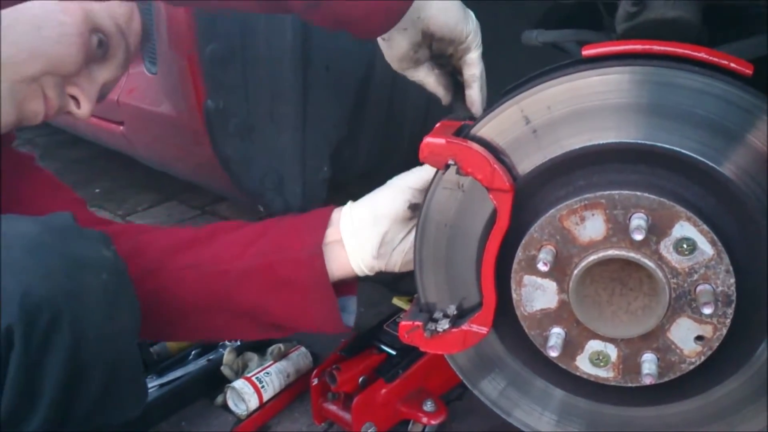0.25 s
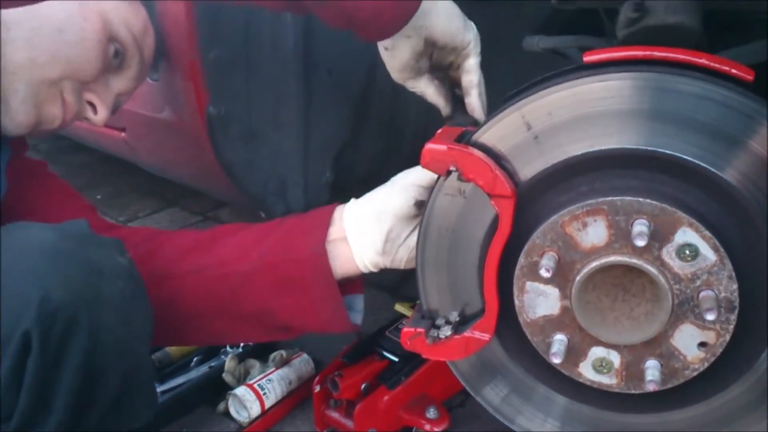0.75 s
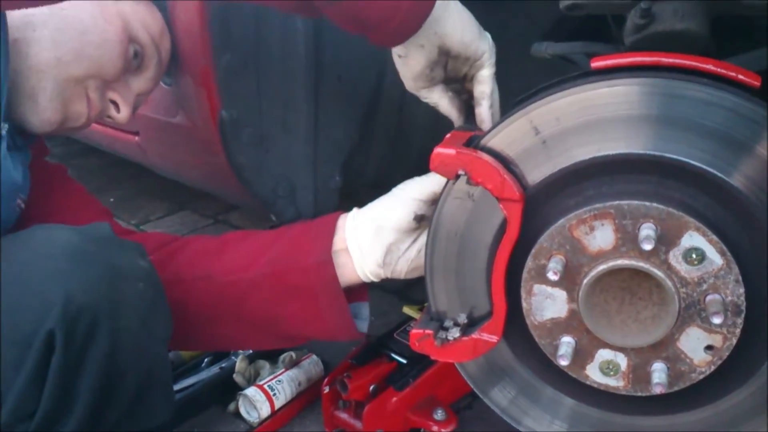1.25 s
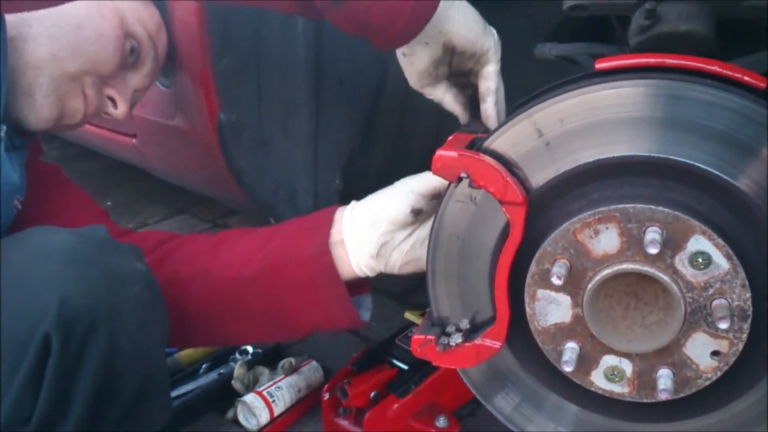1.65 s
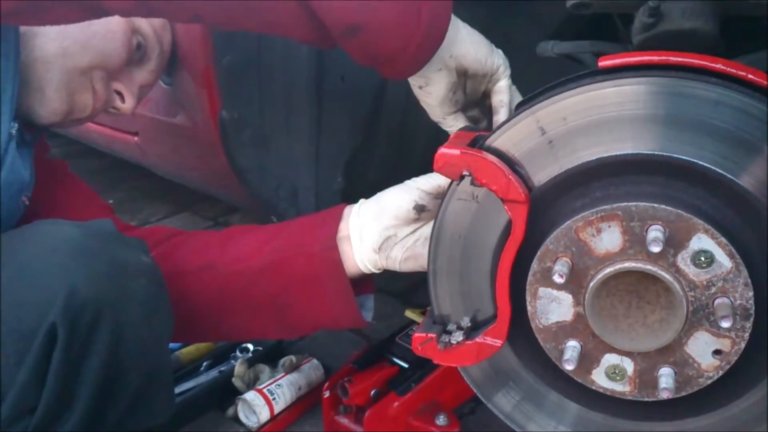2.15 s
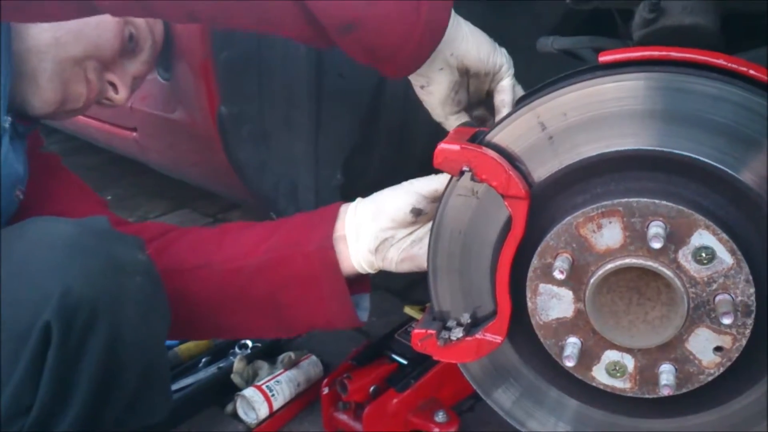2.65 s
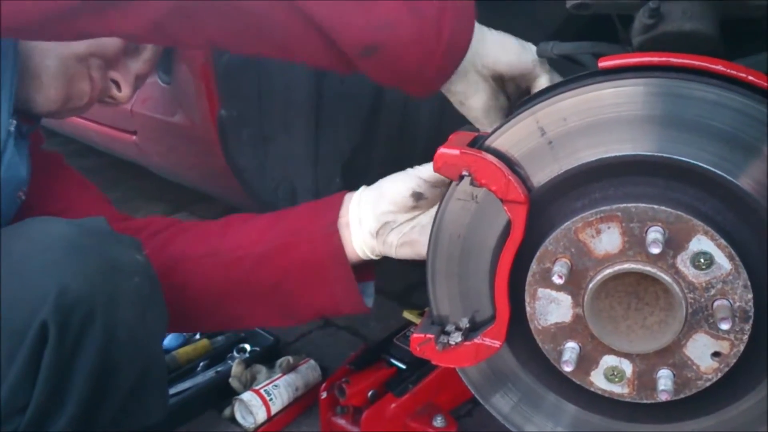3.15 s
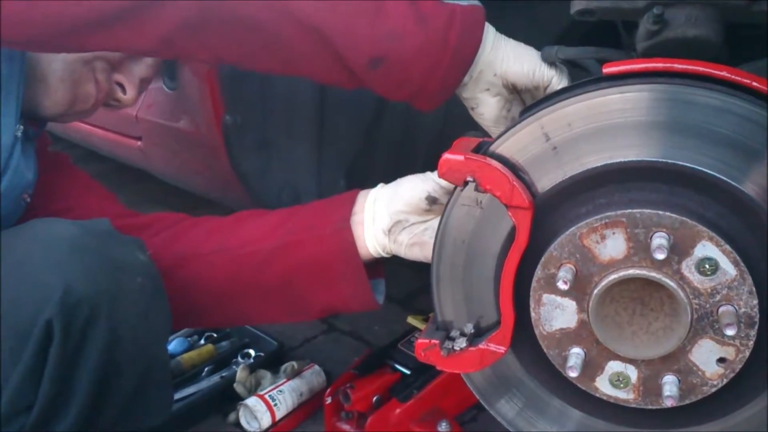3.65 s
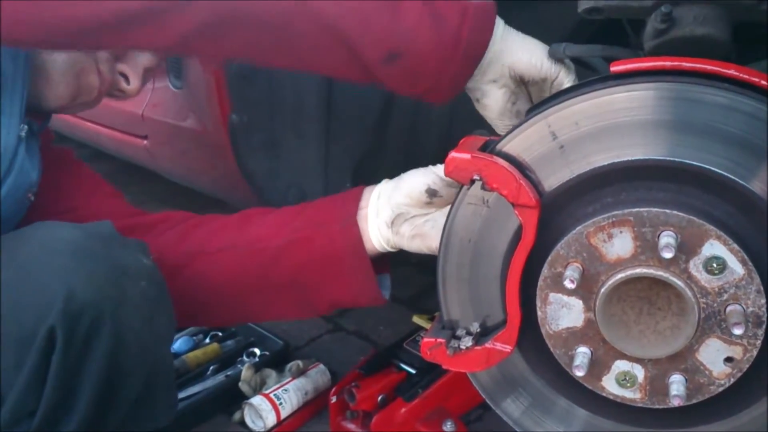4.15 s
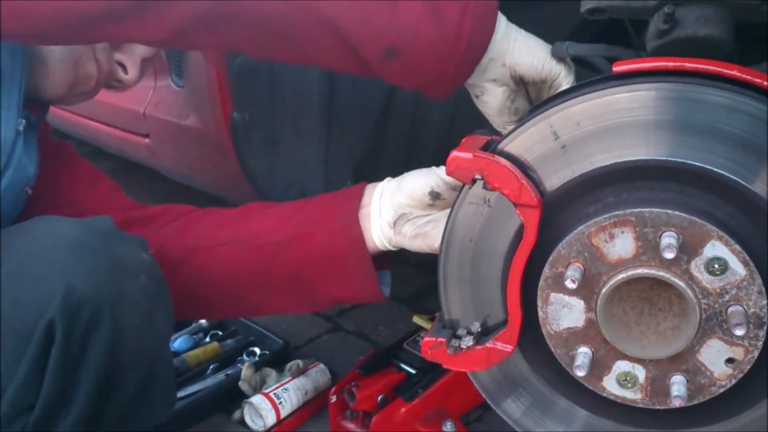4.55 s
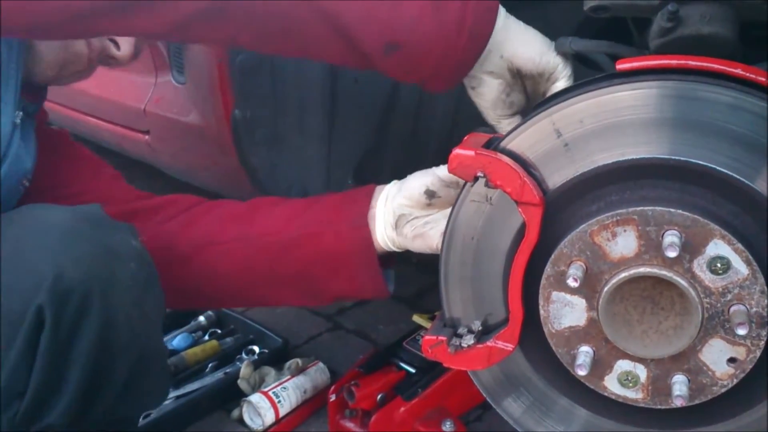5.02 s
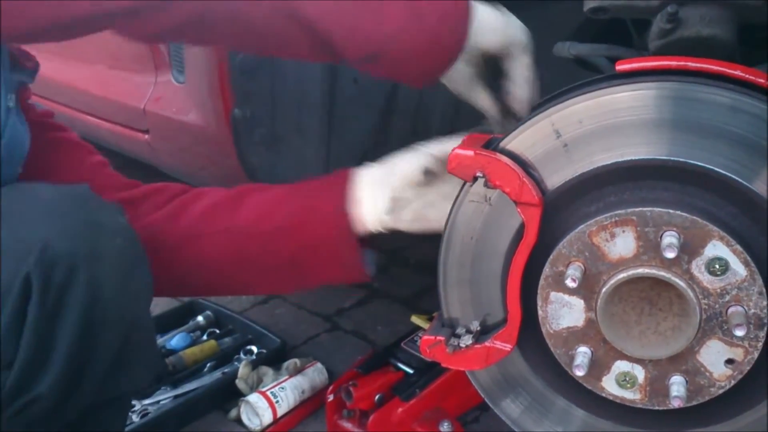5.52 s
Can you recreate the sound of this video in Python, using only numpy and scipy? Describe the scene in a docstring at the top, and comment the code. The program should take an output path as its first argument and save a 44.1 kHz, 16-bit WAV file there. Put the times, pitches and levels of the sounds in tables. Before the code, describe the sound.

Metal pad being fitted: dull knocks, a short rising scrape, then groups of quick ringing clinks over lumpy low wind rumble.

```python
"""Brake pad clinking into its bracket

Modal rings and bursts of chatter make a steel pad clink on the brake disc in three short runs.
Shaped noise makes glove scuffs, dull ringing knocks and one scrape of the pad along its seat.
Lumpy low noise is a draught, nearly all on the right, over a faint noise hush; decaying or
bell-shaped tones make a very faint tick and one tiny squeak."""
import sys
import numpy as np
from scipy.fft import rfft, irfft, next_fast_len
from scipy.io import wavfile
from scipy.ndimage import map_coordinates

SR = 44100
rng = np.random.default_rng(int(sys.argv[2]) if len(sys.argv) > 2 else 0)


def output_pcm(signal):
    """Save a mono or channel-first signal as 16-bit PCM at the path in sys.argv[1].

    Samples are clipped to [-1, 1] before scaling.
    """
    pcm = np.clip(np.atleast_2d(signal).T, -1, 1) * 32767
    wavfile.write(sys.argv[1], SR, np.round(pcm).astype(np.int16))


N = 254935


def amp(db):
    """Decibels to gain."""
    return 10 ** (np.asarray(db) / 20)


def along(points, hz):
    """Each column of a (f/Hz, ..) table, read on a log frequency axis."""
    f, *columns = np.transpose(points)
    return np.array([np.interp(np.log(hz + 1), np.log(f + 1), c) for c in columns])


def curve(rows):
    """A (t/s, value) table as one value per sample."""
    return np.interp(np.arange(N) / SR, *np.transpose(rows))


def unit(x):
    """Scaled to rms 1."""
    return x / np.sqrt(np.mean(x ** 2) + 1e-20)


def wobble(rate):
    """A smooth random curve, rate knots a second."""
    knots = rng.standard_normal(int(N * rate / SR) + 4)
    return map_coordinates(knots, [np.arange(N) * rate / SR])


def filtered(x, response):
    """x times a response of frequency."""
    n = x.shape[-1]
    padded = next_fast_len(n + 8192)
    spectrum = rfft(x, padded) * response(np.fft.rfftfreq(padded, 1 / SR))
    return irfft(spectrum, padded)[..., :n]


def noise(spectrum, size, alike=0):
    """Noise with a density in dB per Hz for each channel; alike is the power share the channels share."""
    share = np.clip(alike, 0, 1)
    own = rng.standard_normal((len(spectrum[0]) - 1, size))
    common = rng.standard_normal(size)
    white = np.sqrt(1 - share) * own + np.sqrt(share) * common
    return filtered(white * np.sqrt(SR / 2), lambda hz: amp(along(spectrum, hz)))


def tinted(x, points):
    """x coloured by (f/Hz, level/dB) points."""
    return filtered(x, lambda hz: amp(along(points, hz)))


def fade(t, t60):
    """Free decay, 60 dB down after t60; full level before t = 0."""
    return np.exp(-np.log(1000) * np.maximum(t, 0) / t60)


def add(track, s, sound):
    """Mix a sound into the track from time s on."""
    part = track[:, round(s * SR):][:, :sound.shape[1]]
    part += sound[:, :part.shape[1]]


def ring(t, modes, colour, length, scatter_db, build_cycles):
    """Decaying modes at new strengths; each needs a few cycles to build, so the low ones bloom late."""
    hz, db, t60, left_db = np.transpose(modes)
    level = amp(db + along(colour, hz)[0] + scatter_db * rng.standard_normal(len(hz)))
    cycles = hz[:, None] * t
    build = 1 - np.exp(-(cycles / build_cycles) ** 2)
    swing = level[:, None] * fade(t, length * t60[:, None]) * build
    start_phase = rng.random((len(hz), 1))
    waves = swing * np.exp(2j * np.pi * (cycles + start_phase))
    # the left hears each mode 0.1 ms later, most of them weaker
    left = amp(left_db) * np.exp(-2j * np.pi * hz * .0001)
    return np.array([left @ waves, waves.sum(0)]).imag


# spectrum of the background hush: f/Hz, left level/dB per Hz, right level/dB per Hz
HUSH_SPECTRUM = [(24.4, -81.5, -67.5), (129, -91.5, -98.5), (287, -100, -99), (527, -105, -101),
                 (846, -92, -91.5), (1000, -92, -93), (1310, -105, -97.5), (1930, -112, -102),
                 (4004, -118, -112), (6790, -121, -115), (7850, -122, -105), (9900, -124, -122),
                 (15280, -125, -123)]


def hush():
    """Distant background noise, slightly restless in level."""
    restless_db = 0.28 * wobble(1.6) + 0.51 * wobble(5.7)
    return noise(HUSH_SPECTRUM, N, alike=.1) * amp(restless_db)


def ticks(first=.025, period=.641):
    """A very faint, regular 430 Hz tick, stronger on the left, that swells and dies within milliseconds."""
    from_tick = (np.arange(N) / SR - first + period / 2) % period - period / 2
    pulse = np.exp(-np.abs(from_tick) / 0.00092) * np.cos(2 * np.pi * 430 * from_tick)
    return amp([[-47], [-75]]) * pulse


# mean relative strength of the draught: t/s, level/dB
DRAUGHT_MEAN = [(0, -59.5), (.6, -60), (1, -61), (1.3, -56), (1.9, -68), (2.4, -63.5), (3, -50.5),
                (3.5, -51), (4.1, -54), (4.6, -44.5), (5.35, -43.5), (5.78, -63)]
# the strongest puffs: t/s, level/dB above the mean
DRAUGHT_PUFFS = [(.52, 11), (.73, 13), (1.23, 7), (2.27, 14), (2.57, 9.5), (3.42, 8), (3.6, 11), (4.2, 5.5),
                 (4.71, 2.5), (4.97, 10), (5.221, 14.5)]
# relative spectrum of the low rumble: f/Hz, level/dB
RUMBLE_SPECTRUM = [(8, 0), (22, -1.5), (65, -8.5), (100, -15), (170, -46.5), (300, -43.5), (700, -85.5)]
# relative spectrum of the higher flutter: f/Hz, level/dB
FLUTTER_SPECTRUM = [(40, -26.5), (100, 6), (180, -2.5), (300, -15), (600, -32), (1500, -56)]
PUFF_S, EDDY_DB, EDDY_RATE = 0.043, 3, 10  # half length of a puff; depth and knots a second of the eddies


def draught():
    """Moving air rumbles in lumps, mostly on the right; stronger gusts bring more of the higher flutter."""
    t = np.arange(N) / SR
    puffs_db = sum(db * np.exp(-((t - s) / PUFF_S) ** 2) for s, db in DRAUGHT_PUFFS)
    gust_db = curve(DRAUGHT_MEAN) + puffs_db + EDDY_DB * wobble(EDDY_RATE)
    lumps = wobble(24)
    rumble = amp(gust_db + 7.5) * unit(noise(RUMBLE_SPECTRUM, N) * amp(1.0 * lumps))
    flutter_lumps = amp(2.1 * lumps + 2.5 * wobble(50))
    # flutter gains 1.22 dB for each dB of gust
    flutter_gain = amp(-56.5 + 1.22 * (gust_db + 50.0))
    flutter = flutter_gain * unit(noise(FLUTTER_SPECTRUM, N) * flutter_lumps)
    return (rumble + flutter) * amp([[-32], [0]])


def squeak(s=.918, length=0.0054, hz=13150, db=-54):
    """A steel clip gives one tiny, very high squeak, a bell-shaped tone of unsteady pitch."""
    t = np.arange(N) / SR
    phase = 2 * np.pi * np.cumsum(hz * (1 + .003 * wobble(300))) / SR
    return amp([[db - 26], [db]]) * np.exp(-((t - s) / length) ** 2) * np.sin(phase)


# how firmly the hand holds the pad, also read by the clinks: t/s, grip/0-1
HAND_GRIP = [(1.6, 0), (2.8, 0.23), (3.2, 0.6), (4.1, 1), (5.3, 0.83)]
# glove rubs: start t/s, level/dB, time to the peak/s
GLOVE_SCUFFS = [(.748, 5.5, 0.0048), (0.893, -1.5, 0.0099), (2.022, -4, 0.0026), (3.203, -3, 0.0027),
                (4.122, -1, 0.0028), (4.386, -10.5, 0.0053), (4.647, -15.5, 0.0086), (5.008, -8, .008),
                (5.193, -1.5, 0.0037), (5.493, -5, 0.012)]
# spectrum of glove on metal: f/Hz, left level/dB per Hz, right level/dB per Hz
GLOVE_SPECTRUM = [(500, -125, -115), (1280, -118, -104), (1900, -114, -90), (3800, -118, -100),
                  (7100, -120, -93.5), (7670, -118, -83), (10100, -122, -104), (15500, -122, -108)]
SCUFF_BODY_DB, GRIP_BODY_DB = -6, 19  # body up to 3 kHz of a light rub, and its gain at full grip


def scuffs():
    """Short, grainy rubs of a glove on metal that catch and let go; a firmer grip gives them more body."""
    out, t, grips = np.zeros((2, N)), np.arange(SR // 5) / SR, curve(HAND_GRIP)
    for s, db, rise in GLOVE_SCUFFS:
        body_db = SCUFF_BODY_DB + GRIP_BODY_DB * grips[round(s * SR)]
        smooth_rub = tinted(noise(GLOVE_SPECTRUM, len(t)), [(3000, body_db), (6000, 0)])
        rub = smooth_rub * amp(1.5 * wobble(380)[:len(t)])
        catch = t / rise * np.exp(1 - t / rise)
        add(out, s, amp(db) * rub * catch)
    return out


# spectrum of the pad rubbing on its seat: f/Hz, left level/dB per Hz, right level/dB per Hz
SCRAPE_SPECTRUM = [(307, -110, -110), (546, -93.5, -90.5), (750, -102, -100), (1260, -100, -88),
                   (1680, -104, -89.5), (2020, -112, -91), (2330, -110, -92), (3330, -120, -107),
                   (5030, -130, -122)]
SLIDE_FROM_S, SLIDE_TO_S, SLIDE_DB = 1.1, 1.41, 7  # start, stop, gain at the stop
SLIDE_GROWS_DB_PER_S, SLIDE_EDGE_T60_S = 51, .1  # swell on the way; time to catch and to die away


def slide():
    """Uneven friction sounds the pad's resonances, pushed ever harder along its seat until it stops."""
    t = np.arange(N) / SR
    push_db = SLIDE_DB - SLIDE_GROWS_DB_PER_S * np.maximum(SLIDE_TO_S - t, 0)
    moving = fade(SLIDE_FROM_S - t, SLIDE_EDGE_T60_S) * fade(t - SLIDE_TO_S, SLIDE_EDGE_T60_S)
    return noise(SCRAPE_SPECTRUM, N) * moving * amp(push_db + 1.6 * wobble(130))


# knocks of the pad held tight: t/s, level/dB, crispness level/dB from 1.6 kHz up
PAD_KNOCKS = [(0.8313, 0.5, 2), (.847, -9, -12), (.864, -22.5, 12.5), (2.1043, -9.5, -14.5)]
# spectrum of a knock: f/Hz, left level/dB per Hz, right level/dB per Hz
KNOCK_SPECTRUM = [(151.5, -100, -87), (406, -70, -62.5), (610, -78, -66), (910, -62, -68), (1410, -88, -70),
                  (2180, -82, -73), (3530, -95, -69.5), (6320, -104, -86), (7800, -105, -75.5),
                  (10040, -110, -90.5), (15460, -110, -80)]
# modes of the clamped pad and bracket: f/Hz, level/dB, t60/s, left against right level/dB
CLAMPED_MODES = [(432, -53, 0.33, -6), (547, -37.5, 0.16, -13), (1122, -44, 0.098, 5),
                 (1653, -38.5, 0.12, -12), (2025, -29, 0.027, -21), (2315, -32.5, 0.056, -21)]


def knocks():
    """Pressed by the hand, the pad clacks with hardly any ring, and grit crunches under it."""
    out, t = np.zeros((2, N)), np.arange(SR // 3) / SR
    for s, db, crisp_db in PAD_KNOCKS:
        colour = [(600, 0), (1600, crisp_db)]
        crunch = amp(2.2 * wobble(600)[:len(t)])
        burst = tinted(noise(KNOCK_SPECTRUM, len(t), alike=0.39), colour) * crunch
        low = tinted(burst, [(1500, -1.5), (5000, -22.5)])
        body = low * (fade(t, t60=0.16) + amp(-18) * fade(t, t60=0.63))
        crack = (burst - low) * fade(t - .004, t60=0.088)
        tone = ring(t, CLAMPED_MODES, colour, 1, scatter_db=0.0, build_cycles=1.9)
        contact = (body + crack) * (1 - np.exp(-t / 0.0017))
        add(out, s, amp(db) * (tone + amp(-4) * contact))
    return out


# pad meets disc: t/s, force level/dB, flatness of the landing/0-1,
# disc ping level/dB near 5.5 kHz, disc edge mode level/dB near 8 kHz, relative ring length
PAD_CLINKS = [(1.3786, -16, 0.01, -17.5, -11, 2.5), (1.5431, -0.5, 0.02, 6.5, -8.5, 1.086),
              (1.7348, 2.5, 0.17, 8.5, 13, 0.99), (2.6205, -11.5, 0, -10, -5, 0.99),
              (2.7844, -.5, 0.62, -4, -3, 0.97), (2.9753, 1.5, 0.97, 5, -4.5, 0.87),
              (4.898, -4, 0, -18.5, -1, 0.62), (5.0798, -2, 0.93, -9, -6, 0.8),
              (5.2467, 2, 0.47, -7.5, 0, 0.78), (5.362, -9.5, .2, -8, -8, 0.71)]
# points where each blow's colour is set: f/Hz
BLOW_COLOUR_HZ = [900, 1900, 2900, 4200, 5500, 6900, 8200, 8900]
# modes of disc and bracket before each blow's colour and length:
# f/Hz, level/dB, t60/s, left against right level/dB
STEEL_MODES = [(170, -44, .14, -11), (220, -35.5, .13, -8), (371, -44.0, 0.16, -14), (654, -53.5, 0.37, -3),
               (731, -38.4, 0.15, -1), (782, -39.4, 0.13, 0), (931, -44.9, 0.24, 2), (1006, -47.5, 0.22, 2),
               (1117, -47.6, 0.17, 3), (1592, -40.5, 0.33, -13), (2040, -52.0, 0.46, -25),
               (2090, -47.0, 0.3, -22), (2140, -55.3, 0.45, -19), (2828, -40.5, 0.46, -24),
               (2900, -44.2, 0.46, -19), (3381, -62.1, 0.38, -19), (3784, -44.2, 0.28, -27),
               (4188, -38.5, 0.3, -18), (5108, -53.5, 0.14, -24), (5363, -42.8, 0.19, -24),
               (5503, -31.4, 0.23, -27), (5744, -39.6, 0.23, -34), (6841, -46.1, 0.23, -40),
               (7080, -48.0, 0.17, -43), (8214, -32.8, 0.12, -55), (8888, -48.9, 0.12, -35),
               (9600, -53.2, 0.14, -36), (11000, -58, 0.15, -25), (12550, -68, .13, -22),
               (13900, -65, 0.15, -20), (15450, -68, 0.15, -34)]
# dense, quickly damped chatter of a clink: f/Hz, left level/dB per Hz, right level/dB per Hz
CHATTER_SPECTRUM = [(100, -100, -78.5), (220, -78, -70.5), (505.6, -84.5, -68.5), (810, -56, -57.5),
                    (1100, -56.5, -58.5), (1370, -69.5, -66), (1715, -63, -48.5), (2375, -83.5, -65.5),
                    (3190, -83.5, -65), (5200, -96.5, -71.5), (7950, -104, -77), (9900, -110, -99.5),
                    (15430, -108, -93.5)]
# how a blow weights the resonances near 1.7, 2.3 and 2.9 kHz, in that order:
# level/dB, slope/dB per dB of force, level/dB at full grip, level/dB for a flat landing
PAD_TONE_WEIGHTS = (1.5, 0.5, -1, -9.5)
CLACK_WEIGHTS = (-2.5, 2, -17.5, 13.5)
RING_WEIGHTS = (2.5, -0.16, 0, -2.5)
PAD_HZ, GRIP_RAISES_HZ = 1677.4, 59.6  # the pad's pitch held loosely, and its rise at full grip
CHATTER_S, GRIP_CALMS = 0.0076, 0.36  # time of contact held loosely, and the share lost at full grip
GRIP_MUTES_DB = 3.5  # loss of the modes near 7 kHz at full grip


def clinks():
    """The pad chatters briefly on the disc and both ring; grip raises the pad's pitch, dulls its clack."""
    out, t, grips = np.zeros((2, N)), np.arange(SR // 2) / SR, curve(HAND_GRIP)
    weights = np.array([PAD_TONE_WEIGHTS, CLACK_WEIGHTS, RING_WEIGHTS])
    # the dense resonances of the assembly answer every blow in much the same way
    assembly = noise(CHATTER_SPECTRUM, len(t), alike=0.55)
    for s, db, flat, ping_db, edge_db, length in PAD_CLINKS:
        grip = grips[round(s * SR)]
        pad_db, clack_db, ring_db = weights @ [1, db, grip, flat]
        pad_hz = PAD_HZ + GRIP_RAISES_HZ * grip
        chatter = CHATTER_S * (1 - GRIP_CALMS * grip)
        shimmer_db = (ping_db + edge_db) / 2 - GRIP_MUTES_DB * grip
        # a gentle touch wakes the upper modes less
        colour_db = [0, 0, ring_db, .45 * db, ping_db, shimmer_db, edge_db, 0.55 * db - 2.0]
        colour = list(zip(BLOW_COLOUR_HZ, colour_db))
        disc = ring(t, STEEL_MODES, colour, length, scatter_db=1.7, build_cycles=2.3)
        # the friction lining damps the pad's own modes quickly:
        # f/Hz, level/dB, t60/s, left against right level/dB
        pad_modes = [(1580.5, -26, 0.0867, -14.5),
                     (pad_hz, -16.5 + pad_db, .09, -22),
                     (pad_hz * 1.05, -26, .055, -20),
                     (2325, -21.5 + clack_db, .04, -17),
                     (2660, -30 + .5 * clack_db, .045, -15),
                     (2922.5, -25.5, .15, -19.5)]
        pad = ring(t, pad_modes, colour, length, scatter_db=0.88, build_cycles=4.3)
        # each blow adds a little chatter of its own
        own_chatter = noise(CHATTER_SPECTRUM, len(t), alike=.5)
        grit = tinted(0.85 * assembly + 0.14 * own_chatter, colour)
        body = tinted(grit, [(4500, -2.0), (11000, -25.0)])
        # the treble dies soon after the contact; the wheel arch holds a short, weak tail of the rest
        crack = (grit - body) * fade(t - chatter, t60=0.012)
        rattle = body * (fade(t - chatter, t60=0.071) + amp(-17.0) * fade(t, t60=0.44))
        contact = (crack + rattle) * (1 - np.exp(-t / .0002))
        add(out, s, amp(db) * (disc + amp(1.5) * pad + amp(-2.0) * contact))
    return out


def scene():
    """All the layers summed in stereo, background first."""
    background = hush() + ticks() + draught()
    handling = squeak() + scuffs() + slide() + knocks()
    return background + handling + clinks()


TOP_HZ = 15700  # upper band limit


def record(dry):
    """A steep low-pass keeps nothing above the band limit."""
    return filtered(dry, lambda hz: hz < TOP_HZ)


dry = scene()
out = record(dry)
output_pcm(out)
```